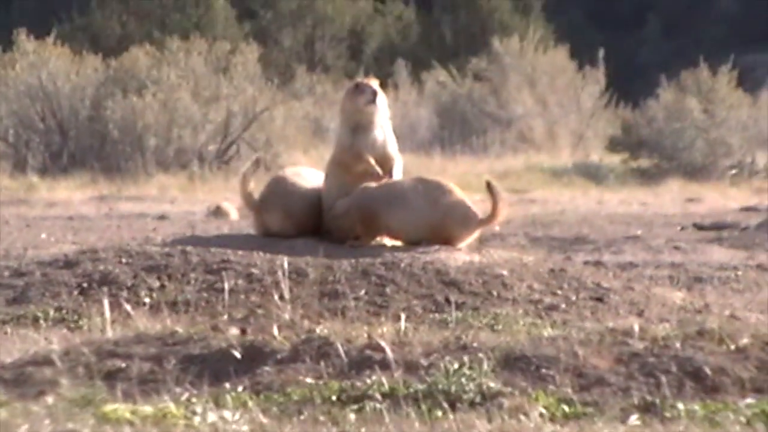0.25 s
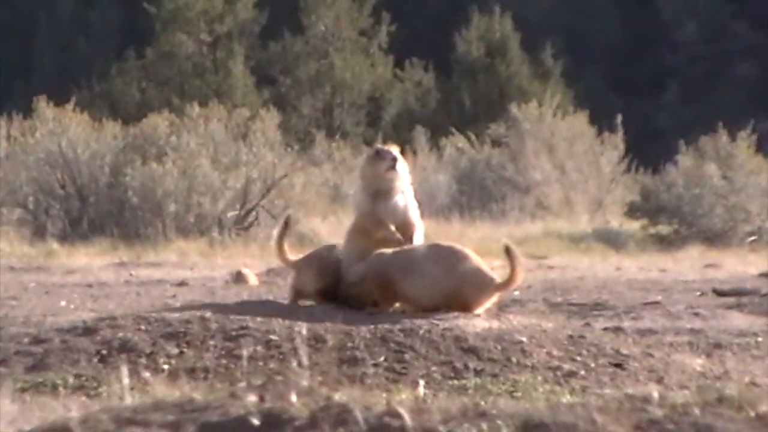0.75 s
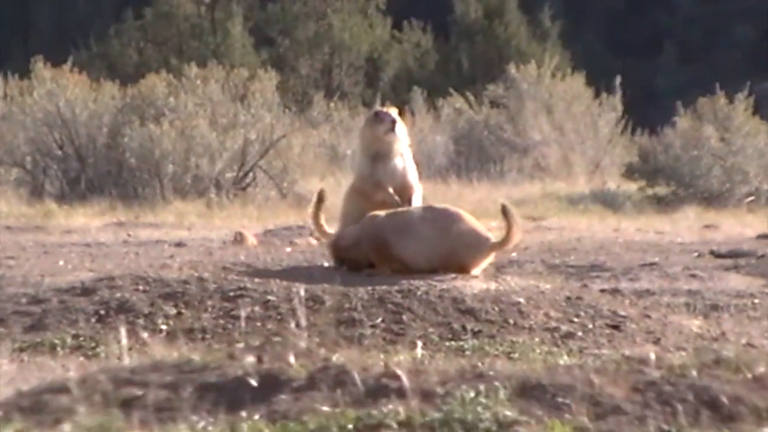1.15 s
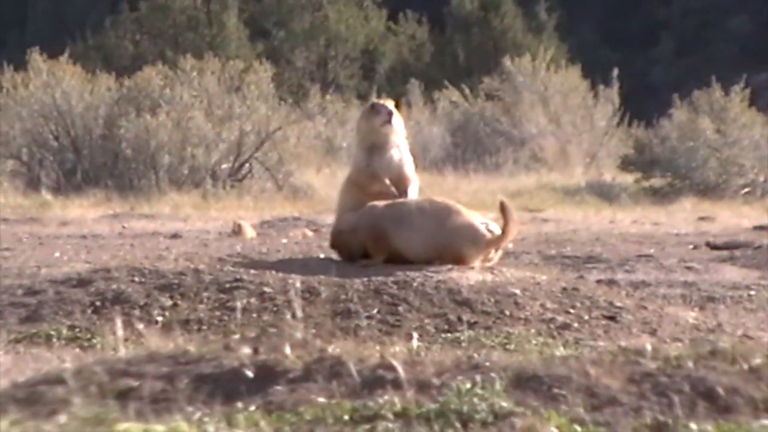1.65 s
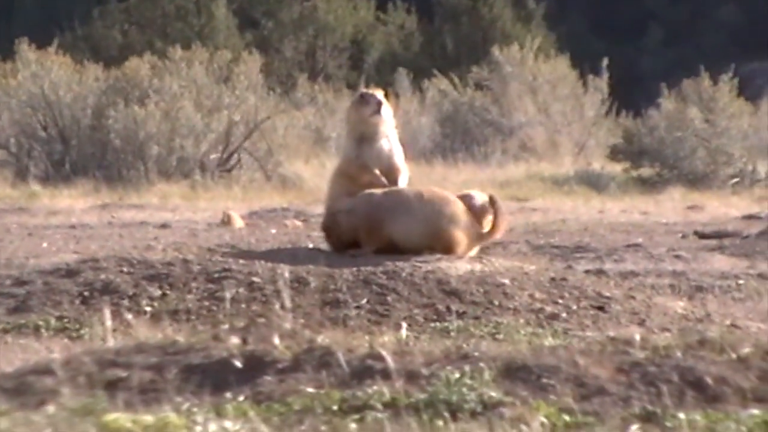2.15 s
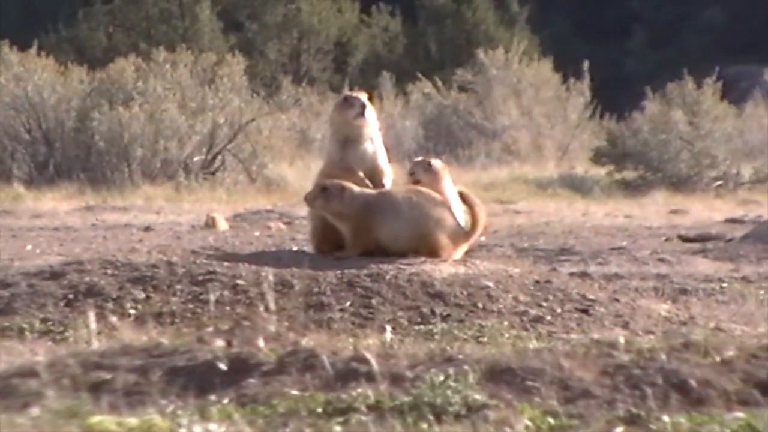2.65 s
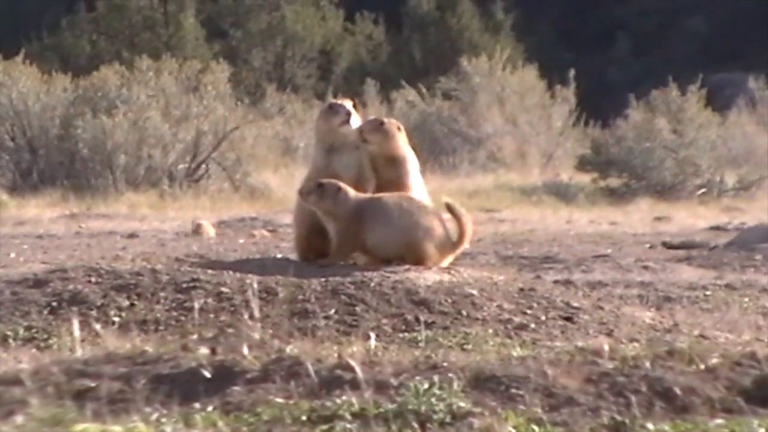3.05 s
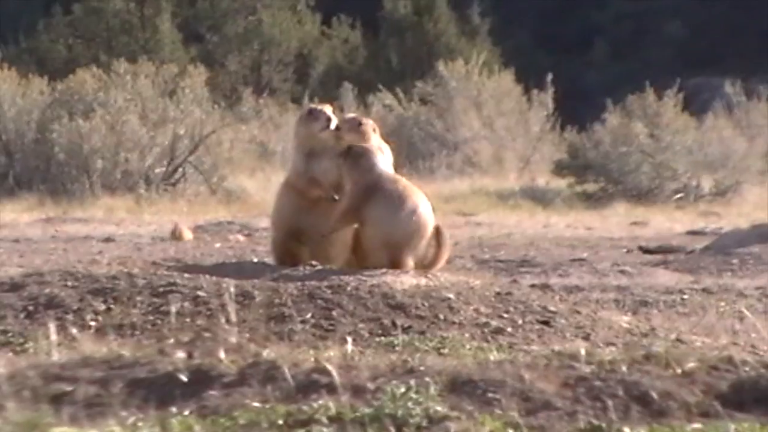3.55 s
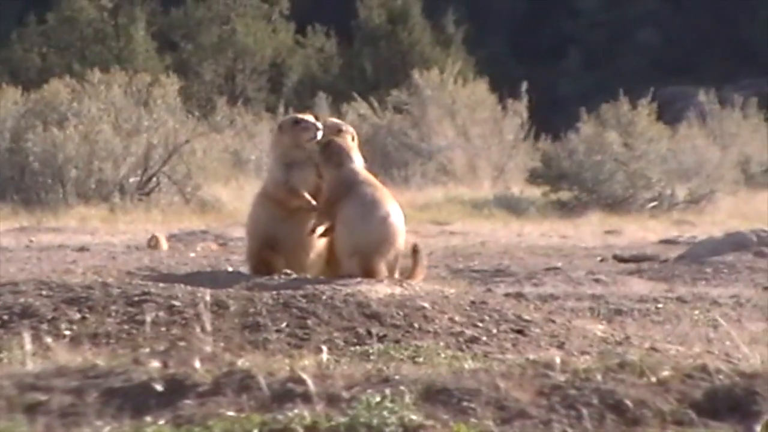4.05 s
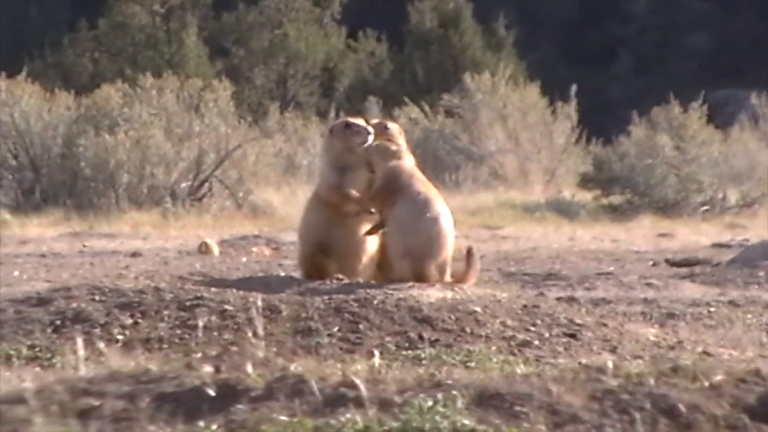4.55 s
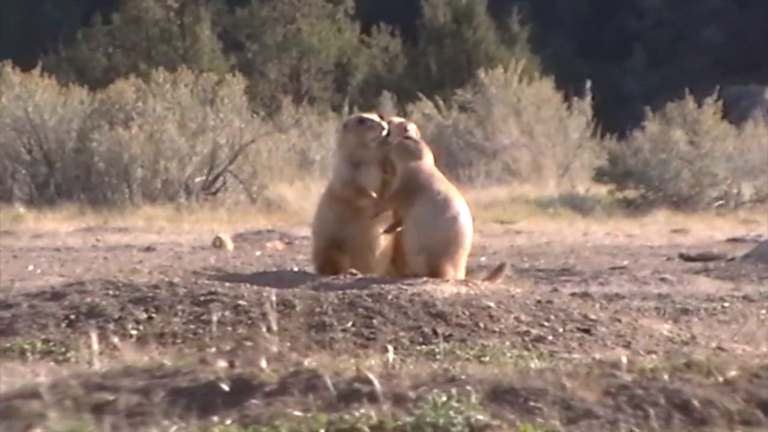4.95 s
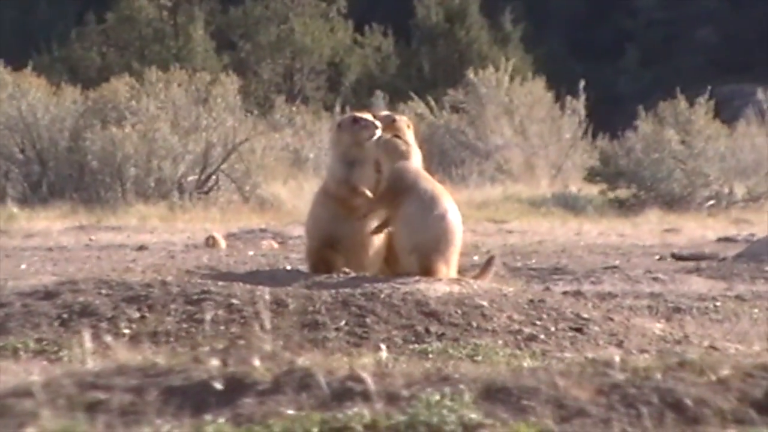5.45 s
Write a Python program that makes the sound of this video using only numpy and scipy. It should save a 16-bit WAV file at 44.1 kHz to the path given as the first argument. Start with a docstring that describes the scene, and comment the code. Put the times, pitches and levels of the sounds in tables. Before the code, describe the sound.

A prairie dog yaps out sharp, squeaky barks about four times a second over a steady outdoor rush, with a loud snap on the microphone partway.

```python
"""A traffic-like rush and hiss, a thin electronic tone and low noise run throughout; wind thumps the microphone.
Over them burrowing rodents bark on open grassland, in harmonic arches echoed faintly by a slope.
Early on the recorder's housing is knocked, as decaying modes over a low thump; later a squeal has two voices.
The housing then snaps sharply, modes ringing over a low thump and a rattle of noise bands; late on, shaped
noise scuffs it twice.
"""
import sys
import numpy as np
from scipy import signal
from scipy.io import wavfile
from scipy.ndimage import uniform_filter1d

SR = 44100
rng = np.random.default_rng(int(sys.argv[2]) if len(sys.argv) > 2 else 0)


def ratio_of_db(decibels):
    """Turn decibels (scalar or array-like) into linear amplitude factors; 0 dB maps to 1."""
    return 10 ** (np.asarray(decibels, float) / 20)


def bounce(signal):
    """Save signal as a 16-bit WAV file at the path given by the first command-line argument."""
    frames = np.transpose(np.atleast_2d(signal))
    limited = np.clip(frames, -1, 1)
    pcm = np.round(limited * 32767).astype(np.int16)
    wavfile.write(sys.argv[1], SR, pcm)


N = 250929

# spectral density of the rush and hiss: f/Hz, relative level per Hz/dB
AIR_SPECTRUM = [(35, -38), (60, -13.5), (87, -19.5), (130, -6.5), (168, -11), (262, -4.5), (515, -5.5),
                (698, -2), (785, -1), (1010, -1.5), (1550, -9), (2050, -7.5), (2900, -10.5), (4220, -11.5),
                (16000, -26)]
# swell of the rush near 1 kHz, read against SWELL_MEAN_DB: t/s, level/dB
RUSH_SWELL = [(0.0, -66.5), (0.57, -67.5), (1.6, -63.5), (2.71, -68), (3.26, -68), (4.15, -60.5),
              (4.69, -66), (5.25, -69), (5.69, -65.5)]
# correlation of left and right noise: f/Hz, likeness/1
PORT_LIKENESS = [(60, 0.53), (180, 0.8), (550, 0.7), (1650, 0.7), (4970, 1), (15000, 0.95)]
AIR_DB, SWELL_MEAN_DB = -61.5, -67
WHINE_HZ, WHINE_DB = 15734, -89

# low thumps on the ports: wind gusts, and the housing's own thump under the knock (0.78 s) and the snap (3.6 s):
# t/s, rms level at the peak/dB, half width to 1/e/s
LOW_THUMPS = [(.38, -79, .04), (.58, -74, 0.089), (.78, -78, 0.041), (.93, -78, 0.041), (2.03, -78, 0.064),
              (2.12, -70, 0.028), (2.52, -78, .03), (2.83, -81, .04), (3.6, -75, 0.041),
              (4.17, -76.5, 0.038), (5.2, -85.5, .1)]

# barks: start t/s, length/s, share of the length before the top/1, top pitch f/Hz, exponent of the fall
# (larger is flatter-topped)/1, level before throat colour/dB, boost of harmonics 3 and up/dB,
# level sent to the slope against harmonic 2/dB
BARK_CALLS = [(.096, 0.054, .28, 1767, 1.74, -42, -1, -6.5), (0.33, 0.053, 0.21, 1790, 1.56, -44, 4, -6),
              (0.579, 0.048, 0.46, 1452, 3.6, -48.5, -3.5, -3),
              (0.79, 0.051, 0.52, 1438, 3.2, -52.5, -2.5, -6),
              (1.008, 0.049, 0.26, 1746, 1.5, -47.5, 0.5, -6),
              (1.254, 0.049, 0.32, 1470, 1.74, -47, -8.5, -2),
              (1.484, 0.049, 0.44, 1488, 3.1, -46.5, -6.5, 0), (1.718, .046, 0.5, 1497, 3.1, -46, -7, 2),
              (1.915, 0.053, 0.38, 1597, 2.1, -48.5, 3, 2), (2.138, 0.048, .29, 1700, 1.3, -48.5, 5, -3),
              (2.432, 0.045, 0.48, 1518, 2.6, -46.5, -9, -3), (2.68, 0.047, 0.43, 1542, 2.3, -47.5, -6, -1),
              (2.972, 0.041, 0.57, 1373, 3.4, -53, -8, 1), (3.341, 0.051, 0.25, 1773, 1.5, -48.5, -9, 0),
              (3.929, 0.049, .33, 1948, 2.3, -48.5, 1.5, 3.5),
              (4.285, 0.05, 0.3, 1943, 2.35, -49.5, 0, 3.5),
              (4.525, 0.052, 0.25, 1887, 1.64, -53.5, 1, 6.5), (4.81, 0.048, 0.25, 1820, 2.2, -46, -1, -2),
              (5.066, .048, 0.41, 1684, 2.5, -49, -8, -4), (5.32, 0.046, 0.49, 1540, 3.2, -47, -13.5, -1.5),
              (5.547, 0.047, 0.42, 1500, 2.5, -57.5, -4.5, 14)]
# strong-weak cycle alternation, giving lines halfway between harmonics: from t/s, to t/s, depth/1
CYCLE_HALVING = [(.338, 0.387, 0.04), (1.268, 1.3, 0.2), (3.952, 3.978, 0.2), (4.535, 4.568, 0.14)]
# harmonic 1 against the peak of harmonic 2: pitch f/Hz, level/dB
FIRST_HARMONIC = [(1400, -32), (1650, -20), (1900, -13)]
# throat colour of harmonics 2 and up: f/Hz, level/dB
THROAT_COLOUR = [(2400, -22), (2900, -8.5), (3200, -6), (3550, -0.5), (4300, -23), (4900, -13.5),
                 (5350, -19), (5800, -18.5), (6400, -8), (6950, -8.5), (7400, -12.5), (8000, -16.5),
                 (8700, -27), (10500, -36)]
# throat colour of a later run of higher barks: f/Hz, level/dB
LATER_THROAT_COLOUR = [(2600, -18), (3050, -6.5), (3450, -2), (3740, 0.5), (3890, -12), (4600, -14),
                       (5200, -13), (5550, -25), (5850, -5.5), (6200, -14), (6950, -8.5), (7450, -10.5),
                       (7800, -24), (10000, -39)]
LATER_FROM_S, LATER_TO_S = 3.2, 5.2
BARK_ATTACK_S, BARK_RELEASE_S, EFFORT_DB_PER_OCTAVE = 0.0069, 0.008, 9
RISE_SHARE, FALL_SHARE = 0.16, 0.25   # a bark starts and ends these shares below its top pitch
RISE_ROUNDER = 0.3                    # added to the exponent for the rise

# slope echoes: delay t/s, level/dB, decay time to 1/e/s
SLOPE_ECHOES = [(0.062, -15.5, .01), (.085, -21, .025), (.14, -25.5, .03)]
ECHO_LOW_HZ, ECHO_HIGH_HZ = 2600, 4300

# contacts of the dull knock: t/s, level/dB
KNOCK_CONTACTS = [(.77545, -34), (.77735, -31.5)]
# housing modes under the knock: f/Hz, level/dB, t60/s, share moving the two ports in opposition/1
KNOCKED_MODES = [(192, -5.5, 0.017, 0.11), (373, -1, 0.029, 0.067), (755, -1.5, 0.038, 0.098),
                 (1270, -3.5, 0.023, 0.1), (1840, -0.5, 0.017, 0.1), (3300, -7.5, 0.0043, 0.088),
                 (5860, -12, 0.005, 0.046)]

# squeal: t/s, pitch f/Hz, rms level of harmonic 2/dB, second voice f/Hz, second voice level/dB
SQUEAL_PATH = [(2.842, 1700, -66, 3100, -86), (2.848, 1780, -66, 3120, -90),
               (2.859, 2126, -60.5, 3060, -85), (2.872, 2240, -69, 3100, -71),
               (2.895, 2188, -60, 3130, -64), (2.93, 2140, -56, 3040, -61), (2.955, 2120, -53.5, 2990, -65),
               (2.972, 2090, -60, 2880, -68), (2.985, 1760, -65, 2900, -90), (2.996, 1550, -66, 2900, -90)]

# contacts of the housing snap: t/s, level/dB
SNAP_CONTACTS = [(3.59811, -4.2), (3.59881, -11.5), (3.59952, -10.5)]
# housing modes under the snap: f/Hz, level/dB, t60/s, share moving the two ports in opposition/1
SNAPPED_MODES = [(598.7, -30.5, .052, .6), (828, -32, 0.0675, .5), (1007, -25, .082, .5),
                 (1156, -17, 0.024, -.5), (1840, -13.5, 0.03, .1), (2090, -22.5, 0.031, -.2),
                 (2500, -29, .062, .1), (2620, -9.5, 0.01106, .08), (3244, -8, 0.025, -.08),
                 (3917, 0.5, 0.014, .05), (3964, -7.5, 0.021, .05), (4580, -9, 0.012, -.05),
                 (5796, -9, 0.011, -.05), (5720, -34.5, 0.037, 0.04), (6373, -10.5, 0.015, 0.11),
                 (7336, -5.5, 0.0085, 0.007), (8310, -12, .0063, -.12), (9285, -21.5, 0.018, 0.091),
                 (10854, -17.5, 0.012, .15), (13530, -16, 0.0049, -.1), (724, -44.5, 0.208, .4),
                 (3844, -56, .4, .05), (4043, -54.5, 0.3, .05), (6700, -58, .2, .05), (7990, -61, .25, .05)]
# noise bands after the snap: low f/Hz, high f/Hz, rms level at onset of the shared part/dB, t60/s
RATTLE_BANDS = [(497, 1400, -43, 0.14), (1396, 2800, -45.5, .05), (3000, 7500, -47, .04),
                (7040, 13000, -51, .03)]

# scuffs: t/s, rms level at full strength/dB, rise/s, length/s
SCUFF_RUBS = [(4.737, -55, .006, 0.043), (4.783, -55.5, .006, 0.047)]
# spectral density of the scuffs: f/Hz, relative level per Hz/dB
SCUFF_SPECTRUM = [(300, -26), (700, -6), (1400, 4.5), (2500, -2.5), (5000, -1.5), (8000, -16), (12000, -33)]

OPPOSED = np.array([[1], [-1]])   # a motion of opposite sign at the two ports


def rms_one(x):
    """Normalisation: a signal divided by its root mean square has unit rms."""
    return x / np.sqrt(np.mean(x ** 2) + 1e-20)


def at_hz(points, hz):
    """Spectral interpolation: level is taken as linear in the logarithm of frequency."""
    point_hz, value = np.array(points)[:, 0], np.array(points)[:, 1]
    return np.interp(np.log(hz), np.log(point_hz), value)


def drift(rate_hz, count):
    """Low-pass noise: two equal poles leave random motion below rate_hz, with unit rms."""
    # computed at one fortieth of the sample rate; the first 2000 values let the filter settle
    pole = np.exp(-80 * np.pi * rate_hz / SR)
    white = rng.standard_normal(count // 40 + 2002)
    slow = rms_one(signal.lfilter([1], [1, -2 * pole, pole * pole], white)[2000:])
    return np.interp(np.arange(count) / 40, np.arange(len(slow)), slow)


def band(x, low_hz, high_hz):
    """Band-pass filtering: a Butterworth response is maximally flat between its corners."""
    corners = [low_hz, min(high_hz, 0.45 * SR)]
    return signal.sosfilt(signal.butter(2, corners, "band", fs=SR, output="sos"), x)


def coloured(spectrum, patchy_db, swell_db):
    """Spectral synthesis: third-octave noise bands, partly correlated between ports, flicker and sum to rms 1."""
    out = 0
    edges = 25 * 2 ** np.arange(0, 9.5, 1 / 3)
    white = rng.standard_normal((2, 2, N))
    for k, (low, high) in enumerate(zip(edges, edges[1:])):
        mid, side = band(white[k % 2], low, high)   # neighbouring bands use independent noise
        hz = np.sqrt(low * high)
        alike = np.clip(at_hz(PORT_LIKENESS, hz), 0, 0.999)
        swell_share = np.exp(-(np.log2(hz / 1050) / 0.47) ** 2)   # the swell centres on 1050 Hz
        gain = ratio_of_db(at_hz(spectrum, hz) + patchy_db * drift(4.4, N) + swell_share * swell_db)
        out = out + gain * (np.sqrt(1 + alike) * mid + np.sqrt(1 - alike) * side * OPPOSED)
    return rms_one(out)


def air():
    """Broadband noise: the far rush and hiss are a random spectrum whose bands near 1 kHz swell."""
    t, level_db = np.transpose(RUSH_SWELL)
    swell_db = np.interp(np.arange(N) / SR, t, level_db) - SWELL_MEAN_DB
    return ratio_of_db(AIR_DB) * coloured(AIR_SPECTRUM, 0.99, swell_db)


def whine():
    """Pure tone: a steady sinusoid gives the single line of a thin electronic tone."""
    return ratio_of_db(WHINE_DB) * np.sqrt(2) * np.sin(2 * np.pi * WHINE_HZ * np.arange(N) / SR)


def low_thumps(lumpy_db=2.0, top_hz=95, calm_db=-92):
    """Low-frequency noise bursts: wind and housing thumps are Gaussian swells, mostly shared by both ports."""
    t = np.arange(N) / SR
    swells = ratio_of_db(calm_db)
    for peak_s, db, width in LOW_THUMPS:
        swells = swells + ratio_of_db(db) * np.exp(-((t - peak_s) / width) ** 2)
    low_noise = band(rng.standard_normal((2, N)), 28, top_hz)
    mid, side = band(low_noise, 20.1, top_hz * 1.3)
    return swells * ratio_of_db(lumpy_db * drift(20, N)) * rms_one(mid + 0.201 * side * OPPOSED)


def arch(start, length, top_share, top_hz, roundness):
    """Frequency glide: pitch rises to a top and falls by power laws, under a linear attack and release."""
    span = np.arange(round(start * SR), round((start + length) * SR))
    t = span / SR - start
    u = t / length
    rise = np.clip(1 - u / top_share, 0, 1) ** (roundness + RISE_ROUNDER)
    fall = np.clip((u - top_share) / (1 - top_share), 0, 1) ** roundness
    pitch = top_hz * (1 - RISE_SHARE * rise - FALL_SHARE * fall)
    gate = np.clip(np.minimum(t / BARK_ATTACK_S, (length - t) / BARK_RELEASE_S), 0, 1)
    # the root of 2 turns rms levels into peak amplitudes
    return span, gate * np.sqrt(2), uniform_filter1d(pitch, size=180, mode="nearest")


def barks(jitter=0.0045, flutter_db=1.76, uneven_db=1.5):
    """Source and filter: trembling harmonics take the throat's colour; also returns the part sent to the slope."""
    out, sent, halving = np.zeros(N), np.zeros(N), np.zeros(N)
    for start, end, depth in CYCLE_HALVING:
        halving[round(start * SR):round(end * SR)] = depth
    halving = uniform_filter1d(halving, size=200)
    for start, length, top_share, top_hz, roundness, db, upper_db, toward_db in BARK_CALLS:
        span, gate, pitch = arch(start, length, top_share, top_hz, roundness)
        count = len(span)
        throat = LATER_THROAT_COLOUR if LATER_FROM_S < start < LATER_TO_S else THROAT_COLOUR
        phase = 2 * np.pi * np.cumsum(pitch * (1 + jitter * drift(110, count))) / SR
        effort_db = db + EFFORT_DB_PER_OCTAVE * np.log2(pitch / top_hz)
        levels = []
        for k in range(2, 7):
            level_db = effort_db + at_hz(throat, k * pitch)
            if k > 2:
                level_db = level_db + upper_db + uneven_db * drift(25, count)
            levels.append(level_db)
        second_peak_db = levels[0].max()
        levels = [second_peak_db + at_hz(FIRST_HARMONIC, pitch)] + levels
        tone = 0
        for k, level_db in enumerate(levels, 1):
            tone = tone + ratio_of_db(level_db + flutter_db * drift(220, count)) * np.sin(k * phase + k)
        out[span] = gate * tone * (1 + halving[span] * np.cos(phase / 2))
        # the slope hears only harmonic 2, mostly at the top of the arch, where the call is loudest at the mouth
        loudness = ratio_of_db(toward_db + second_peak_db) * (pitch / top_hz) ** 8.0
        sent[span] = loudness * gate * np.sin(2 * phase)
    return out, sent


def slope(calls):
    """Diffuse reflection: scattering smears each echo, partly differently per ear, and a middle band returns."""
    t, response = np.arange(SR // 3) / SR, 0
    for delay, db, smear in SLOPE_ECHOES:
        shape = (t > delay) * np.exp(-np.abs(t - delay) / smear)
        unit_energy = shape / np.sqrt(np.sum(shape ** 2))
        response = response + ratio_of_db(db) * unit_energy * rng.standard_normal((2, len(t)))
    response = 0.92 * response[0] + 0.4 * response[1] * OPPOSED
    return signal.fftconvolve(band(calls, ECHO_LOW_HZ, ECHO_HIGH_HZ)[None], response)[:, :N]


def struck(contacts, modes, low_hz):
    """Modal excitation: impulses set damped resonators ringing, signs alternating, high-passed at low_hz."""
    clicks, out = np.full(N, 1e-18), 0
    for contact_s, db in contacts:
        clicks[round(contact_s * SR)] = ratio_of_db(db)
    for k, (hz, db, t60, opposed) in enumerate(modes):
        radius, angle = ratio_of_db(-60 / (t60 * SR)), 2 * np.pi * hz / SR
        poles = [1, -2 * radius * np.cos(angle), radius * radius]
        ring = signal.lfilter([0, ratio_of_db(db) * np.sin(angle)], poles, clicks)
        out = out + (-1) ** k * ring * (1 - opposed * OPPOSED)
    return signal.sosfilt(signal.butter(4, low_hz, "high", fs=SR, output="sos"), out)


def knock():
    """Modal response: two contacts ring the housing's modes as a dull knock."""
    return -struck(KNOCK_CONTACTS, KNOCKED_MODES, low_hz=113)


def voiced(rows, edge_s=0.0016):
    """Smooth glide: a cubic carries pitch through its points, other columns go linearly, under a soft gate."""
    s, pitch, *columns = np.transpose(rows)
    span = np.arange(round((s[0] - edge_s) * SR), round((s[-1] + edge_s) * SR))
    t = span / SR
    gate = np.clip(np.minimum(t - t[0], t[-1] - t) / edge_s, 0, 1)
    i = np.clip(np.searchsorted(s, t) - 1, 0, len(s) - 2)
    step, glide = s[i + 1] - s[i], np.gradient(pitch, s)
    u = np.clip((t - s[i]) / step, 0, 1)
    # cubic through the points with their slopes
    between = pitch[i] + (pitch[i + 1] - pitch[i]) * u * u * (3 - 2 * u)
    bend = step * u * (1 - u) * (glide[i] * (1 - u) - glide[i + 1] * u)
    return span, gate * np.sqrt(2), [between + bend] + [np.interp(t, s, c) for c in columns]


def squeal(first_db=-12, third_db=-22, sum_db=-11, jitter=0.0077, hoarse=0.026, flutter_db=4.5):
    """Biphonation: two independent voices, the second hoarse, with a faint tone at the sum of their pitches."""
    span, gate, (pitch, db, other_hz, other_db) = voiced(SQUEAL_PATH)
    count = len(span)
    one = 2 * np.pi * np.cumsum(pitch * (1 + jitter * drift(80, count))) / SR
    two = 2 * np.pi * np.cumsum(other_hz * (1 + hoarse * drift(160, count))) / SR
    weak = ratio_of_db(first_db) * np.sin(one) + ratio_of_db(third_db) * np.sin(3 * one)
    main = ratio_of_db(db) * (np.sin(2 * one) + ratio_of_db(flutter_db * drift(60, count)) * weak)
    second_gain = ratio_of_db(other_db + flutter_db * drift(60, count))
    second = second_gain * (np.sin(two) + ratio_of_db(sum_db) * np.sin(one + two))
    out = np.zeros(N)
    out[span] = gate * (main + second)
    return out


def snap():
    """Modal response: three rapid contacts ring the housing's modes as a sharp snap."""
    return -struck(SNAP_CONTACTS, SNAPPED_MODES, low_hz=516)


def rattle(side=0.3):
    """Exponential decay: noise bands die after the snap, the high ones first."""
    out, start = np.zeros((2, N)), round(SNAP_CONTACTS[0][0] * SR)
    t = np.arange(SR // 5) / SR
    for low, high, db, t60 in RATTLE_BANDS:
        mid, odd = rms_one(band(rng.standard_normal((2, len(t))), low, high))
        out[:, start:start + len(t)] += ratio_of_db(db - 60 * t / t60) * (mid + side * odd * OPPOSED)
    return out


def scuffs():
    """Friction noise: each short rub is coloured noise with a quick rise and a longer fall."""
    t, shape = np.arange(N) / SR, 0
    for start, db, rise, length in SCUFF_RUBS:
        ramps = np.minimum((t - start) / rise, 1.6 * (start + length - t) / length)
        shape = shape + ratio_of_db(db) * np.clip(ramps, 0, 1)
    return shape * coloured(SCUFF_SPECTRUM, 1.0, 0)


def scene():
    """Superposition: the pressures of air, tone, low thumps, calls, echoes and housing noises add."""
    background = air() + whine() + low_thumps()
    (bark, sent), long_call = barks(), squeal()
    balance = ratio_of_db(np.array([[-0.2], [0.2]]))   # dB, left and right
    calls = (bark + long_call) * balance + slope(sent + long_call)
    housing = knock() + snap() + rattle() + scuffs()
    return background + calls + housing


def band_limit(x):
    """A steep low-pass at the top of the band."""
    return signal.sosfilt(signal.butter(12, 16490, fs=SR, output="sos"), x)


def record(dry):
    """Band limitation: a steep low-pass, 60 dB down from 16.6 kHz, removes the top."""
    low_pass = signal.cheby2(20, 60, 16600, fs=SR, output="sos")
    mix = signal.sosfilt(low_pass, dry)
    return band_limit(mix)


dry = scene()
out = record(dry)
bounce(out)
```